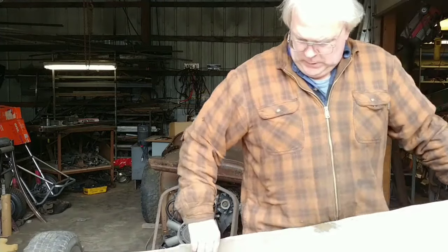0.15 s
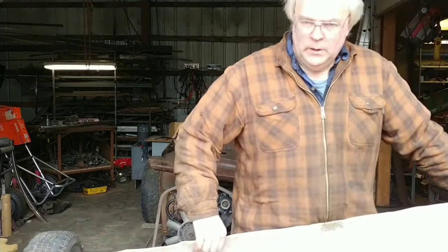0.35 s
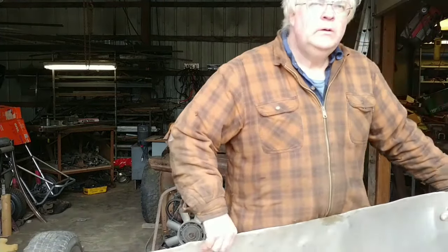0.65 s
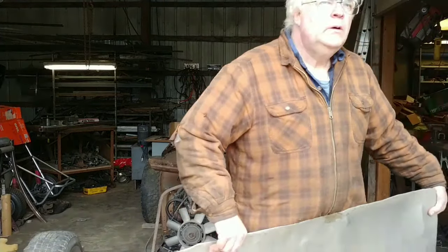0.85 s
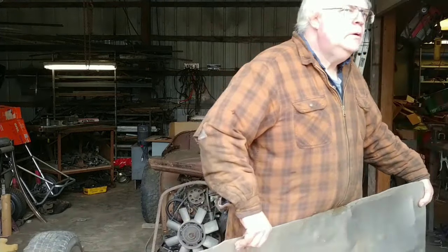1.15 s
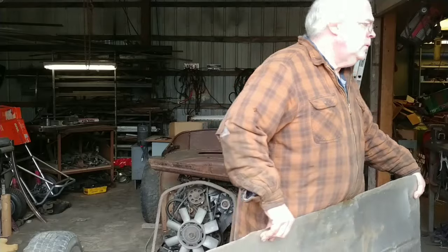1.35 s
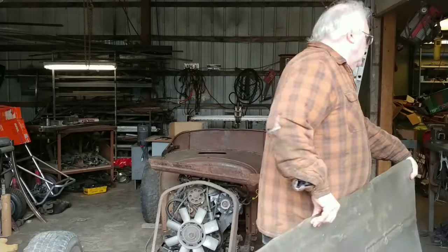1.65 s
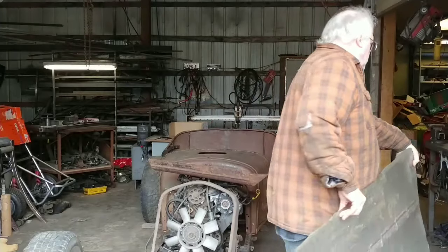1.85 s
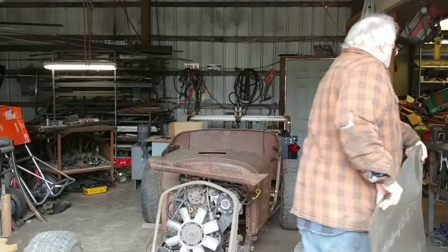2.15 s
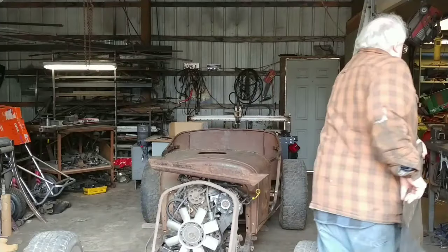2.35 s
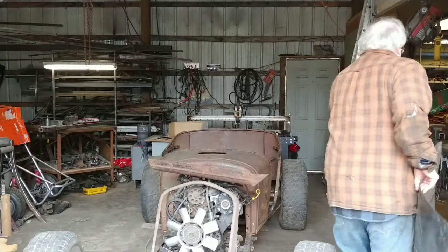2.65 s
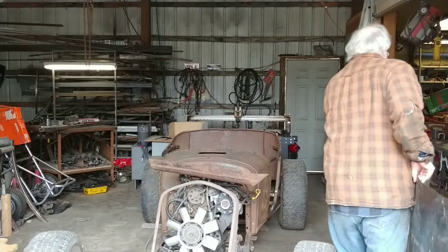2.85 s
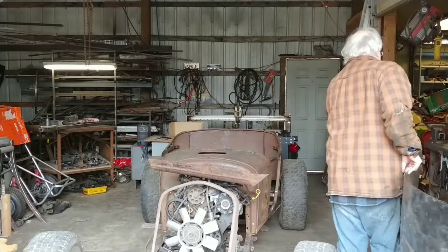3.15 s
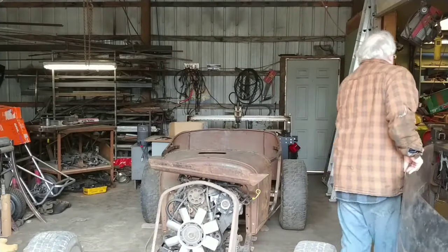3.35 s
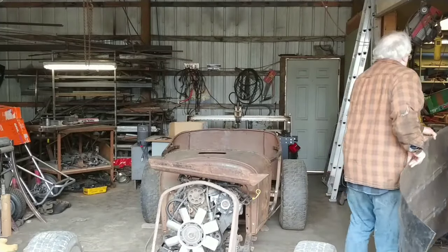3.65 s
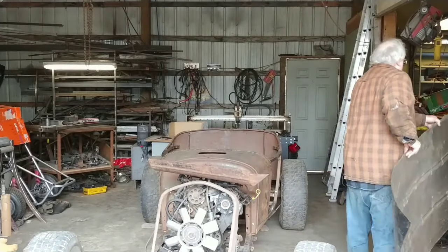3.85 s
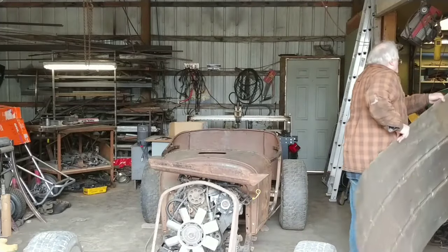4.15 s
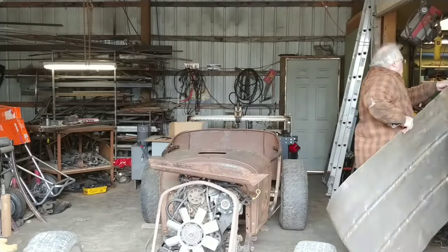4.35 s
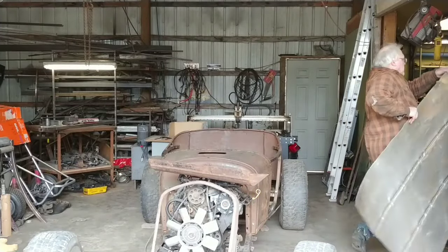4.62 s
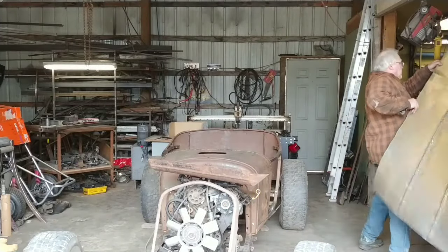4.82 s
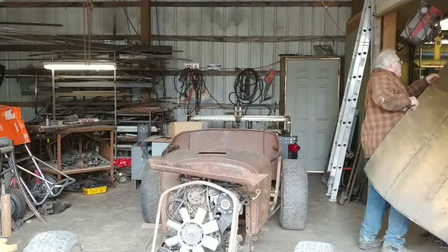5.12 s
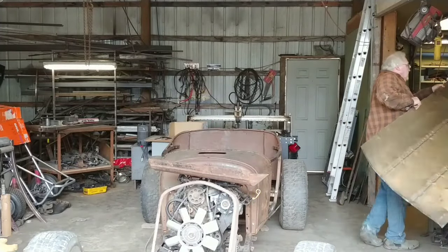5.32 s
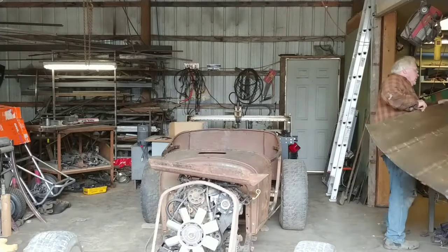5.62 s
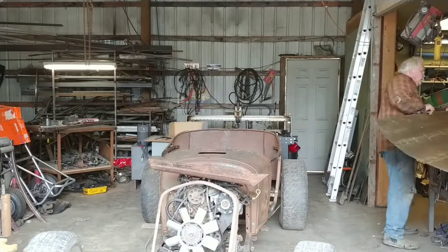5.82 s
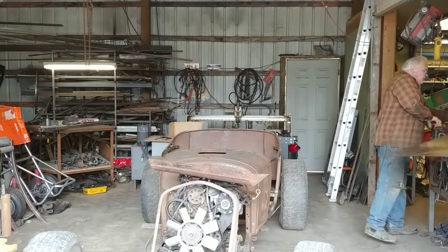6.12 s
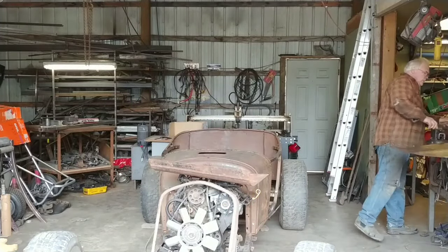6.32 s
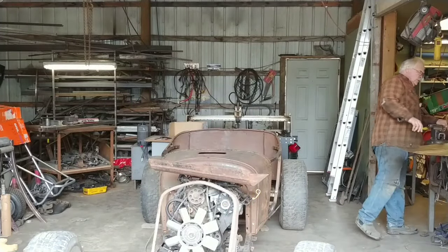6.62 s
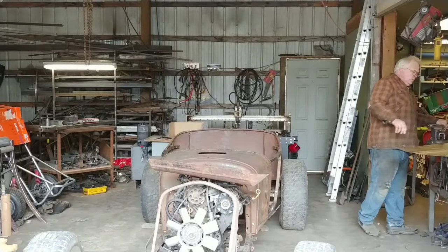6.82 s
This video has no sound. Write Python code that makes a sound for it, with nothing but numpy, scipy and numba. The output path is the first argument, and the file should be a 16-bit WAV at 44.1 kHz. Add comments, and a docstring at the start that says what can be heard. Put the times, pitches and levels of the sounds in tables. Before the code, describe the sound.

A large thin steel sheet wobbles, buckles and clatters in irregular bursts as someone carries it through a workshop and sets it down.

```python
"""A large thin steel sheet is lifted and carried across a workshop, heard through two microphone ports.
Buckles, swings and edge clatter push noise into a dense crowd of plate modes whose pitches slide as it bends.
A few lone modes sing out of the crowd as close beating pairs, each fed by its own rubbing noise.
A changing lag between the ports carries the sheet from left to right; wall sound and still air,
both shaped noise or modes drawn apart for each port, surround it."""
import sys
import numpy as np
from numba import njit
from scipy import signal
from scipy.fft import rfft, irfft, next_fast_len
from scipy.io import wavfile
from scipy.ndimage import uniform_filter1d, map_coordinates

SR = 44100
rng = np.random.default_rng(int(sys.argv[2]) if len(sys.argv) > 2 else 0)


def master(y):
    """Save y as 16-bit WAV."""
    cut = np.clip(np.atleast_2d(y).T, -1, 1)
    pcm = np.round(cut * 32767)  # scale
    wavfile.write(sys.argv[1], SR, pcm.astype(np.int16))


N = 307818


def undb(db):
    """Decibel law: amplitude gain of a level in dB."""
    return 10 ** (np.asarray(db) / 20)


def along(table, hz):
    """Logarithmic pitch scale: reads (hz, value) rows evenly per octave."""
    log_hz, values = np.log(np.array(table)[:, 0]), np.array(table)[:, 1]
    return np.interp(np.log(hz), log_hz, values)


def fft_hz(size):
    """Discrete Fourier transform: the frequency of each bin, at least 1 Hz."""
    return np.maximum(np.arange(size // 2 + 1) * SR / size, 1)


def coloured(table, lo_hz, hi_hz, skirt=5.13):
    """Spectral shaping: white noise takes the table's colour between two soft edges, rms 1."""
    size = next_fast_len(N)
    hz = fft_hz(size)
    soft_edges = np.sqrt((1 + (lo_hz / hz) ** skirt) * (1 + (hz / hi_hz) ** skirt))
    spectrum = rfft(rng.standard_normal(size)) * undb(along(table, hz)) / soft_edges
    noise = irfft(spectrum, size)[:N]
    return noise / noise.std()


# Relative spectrum of the still air of the workshop: pitch_hz [Hz], density_db [dB per Hz]
AIR_COLOUR = [(18, -30), (30, -2), (90, 11.5), (240, -17.5), (439, -10), (863, -16), (1000, -16),
              (12000, -39), (15600, -70), (22000, -120)]
AIR_DB = -59  # rms level at each port


def still_air():
    """Diffuse background noise: independent steady noise at each port."""
    return np.array([coloured(AIR_COLOUR, 20, 12000) for _ in range(2)]) * undb(AIR_DB)


# Spans in which the sound of the events is faded down faster, the steepest near 1.7 s:
# start_s [s], end_s [s], added_fade_db_per_s [dB/s]
FADES = [(0.718, .81, 30), (1.388, 1.602, 31.5), (1.621, 1.72, 152), (2.5, 2.66, 40), (3.1, 3.17, 80),
         (3.456, 3.547, 53), (4.748, 4.906, 24)]
RISE_DB = 16.5  # depth from which an event rises
FADE_POWER = 0.49  # higher modes fade faster by this power of pitch


def held(s, start, rise, hold, db, fade):
    """Exponential decay: an event's power in each range rises, fast at first, holds and fades."""
    rise_db = -RISE_DB * np.maximum(1 - (s - start) / rise, 0) ** 2
    fade_db = fade[:, None] * np.maximum(s - start - rise - hold, 0)
    added_fade_db = sum(rate * np.maximum(np.minimum(s, end) - max(begin, start), 0)
                        for begin, end, rate in FADES)
    return (s >= start) * undb(db[:, None] + rise_db - fade_db - added_fade_db) ** 2


# Buckles and wobbles in a narrow range of low modes:
# start_s [s], rise_s [s], hold_s [s], level_db [dB at the centre],
# centre_octaves [octaves above BUCKLE_HZ], fade_db_per_s [dB/s at BUCKLE_HZ]
BUCKLES = [(0.0, .1, 0.023, -44, 2.26, 21), (0.086, 0.069, .1, -32.5, 2.2, 25),
           (0.267, 0.11, .2, -26, 2.34, 23), (0.627, .008, .04, -16, 1.91, 19.5),
           (.82, .06, 0.018, -18, 1.94, 25.5), (.9, 0.029, 0.016, -13, 2.17, 49),
           (1.056, 0.01, .06, -19.5, 2.69, 27), (1.286, 0.053, .02, -34, 1.4, 20),
           (1.841, 0.0092, .1, -19.5, 2.45, 25), (2.081, .012, .05, -25, 2.3, 21),
           (2.666, 0.011, 0.043, -24.5, 1.35, 14.5), (2.804, 0.054, 0.094, -28, 1.43, 33),
           (3.174, 0.03, .01, -27, 1.16, 25), (3.516, .02, .03, -43, 2.6, 27),
           (3.634, 0.014, .13, -22.5, 2.33, 33), (3.826, 0.025, .03, -23, 2.5, 15.5),
           (4.16, .008, .08, -26, 2.6, 42), (4.18, 0.07, .26, -19.5, 3.75, 12),
           (4.4, .07, .01, -21.5, 2.4, 10), (4.927, 0.009, .08, -26.5, 2.57, 9),
           (5.117, 0.078, 0.022, -17, 2.04, 36), (5.191, 0.036, 0.065, -10.5, 2.48, 16.5),
           (5.78, 0.27, .05, -27.5, 2.58, 25), (6.178, 0.011, .02, -14, 1.78, 33),
           (6.213, 0.056, .08, -13.5, 3.04, 14.5), (6.65, 0.055, .02, -32, 2.35, 6)]
BUCKLE_HZ = 100
BELOW_BOW_DB, ABOVE_BOW_DB = 8.5, 8  # loss per squared octave below and above the centre


def buckle_power(s, hz):
    """Plate buckling: each event's power is bowed around a centre pitch."""
    octaves = np.log2(hz / BUCKLE_HZ)
    power = 0
    for start, rise, hold, db, centre, fade in BUCKLES:
        bow_db = np.where(octaves < centre, BELOW_BOW_DB, ABOVE_BOW_DB)
        level_db = db - bow_db * (octaves - centre) ** 2
        power = power + held(s, start, rise, hold, level_db, fade * 2 ** (FADE_POWER * octaves))
    return power


# Lowest modes while the sheet is swung: time_s [s], level_db [dB]
BASS = [(0.0, -51), (0.15, -42), (0.7, -25.5), (0.85, -28.5), (0.95, -23), (1.77, -70), (1.88, -29.5),
        (2.66, -50), (2.7, -33.5), (3.09, -60), (3.22, -33.5), (3.62, -64), (3.69, -32.5), (4.39, -41),
        (4.47, -30), (4.88, -40), (5.15, -25), (5.85, -43), (6.16, -47), (6.2, -34), (6.32, -29.5),
        (6.34, -32), (6.94, -40), (6.98, -33)]


def swing_power(s):
    """Forced bending: the swing's power follows its level curve."""
    return undb(np.interp(s, *np.transpose(BASS))) ** 2


# Edge contacts that shake the upper modes:
# start_s [s], rise_s [s], hold_s [s], level_db [dB at CLATTER_HZ],
# tilt_db_per_octave [dB/octave], fade_db_per_s [dB/s at CLATTER_HZ]
CLATTERS = [(0.121, 0.093, 0.14, -39, -2, 78), (0.502, 0.021, .02, -28, 0, 89),
            (0.623, .01, 0.00465, -41, 3.5, 117), (.817, .015, 0.036, -33, -2, 78),
            (0.898, 0.0071, 0.019, -27.5, -11, 113), (0.977, 0.021, .01, -24.5, 5.5, 101),
            (1.059, 0.016, 0.039, -21.5, 5, 141), (1.583, 0.0084, .02, -50.5, -1, 200),
            (1.84, 0.0057, .04, -23, 3, 122), (1.944, .018, .005, -28, 5, 79),
            (2.072, 0.011, 0.0046, -26, 4.5, 67.5), (2.395, 0.075, 0.0055, -41, -0.5, 128),
            (2.678, 0.01, .005, -55.5, -0.5, 302), (2.82, .015, 0.11, -58, -4, 107),
            (3.046, 0.055, .02, -53.5, 3.5, 500), (3.286, 0.0074, 0.072, -43.5, 6.5, 48),
            (3.515, .02, 0.052, -48.5, 4, 60), (3.634, 0.016, .005, -22, 3.5, 100),
            (3.82, .008, .005, -33.5, 5.5, 90), (3.833, 0.045, 0.0079, -27, 1, 94),
            (4.157, 0.013, 0.034, -21.5, -1, 52), (4.185, .045, .03, -17, -2.5, 51),
            (4.322, 0.063, 0.081, -14, -1.5, 60.5), (4.842, .03, 0.046, -47, 4, 63),
            (4.928, 0.0078, .01, -28, 4, 57), (5.177, 0.0061, .15, -29, 1.5, 50),
            (5.695, 0.19, 0.036, -35, 1.5, 23), (5.842, 0.24, 0.14, -30, 1.5, 55),
            (6.209, 0.052, 0.0066, -16, 2, 92), (6.23, 0.069, 0.11, -14, -2, 48),
            (6.614, 0.067, .02, -29.5, -0.5, 30)]
CLATTER_HZ = 2200
CLATTER_BOW_DB = 1.5  # loss per squared octave from CLATTER_HZ
LOW_TILT_DB = 1  # per octave: least tilt below CLATTER_HZ


def clatter_power(s, hz):
    """Contact excitation: each edge contact spreads its power over a tilted, bowed spectrum."""
    octaves = np.log2(hz / CLATTER_HZ)
    power = 0
    for start, rise, hold, db, tilt, fade in CLATTERS:
        tilt_db = np.where(octaves < 0, max(tilt, LOW_TILT_DB), tilt) * octaves
        level_db = db + tilt_db - CLATTER_BOW_DB * octaves ** 2
        power = power + held(s, start, rise, hold, level_db, fade * 2 ** (FADE_POWER * octaves))
    return power


def chatter(grain_s, scatter_db):
    """Intermittent contact: the push comes in short grains of scattered size, rms 1."""
    grain = int(grain_s * SR)
    sizes = undb(scatter_db * rng.standard_normal(N // grain + 1))
    gain = uniform_filter1d(np.repeat(sizes, grain), grain)[:N]
    return gain / np.sqrt(np.mean(gain ** 2))


# Edges of the pitch ranges that are pushed separately: pitch_hz [Hz]
EDGES_HZ = (60, 200, 650, 1400, 3500, 12000)
# Typical decay of held steel, damped by the hands: pitch_hz [Hz], t60_s [s]
RING = [(100, 0.26), (500, .3), (1500, 0.25), (4000, 0.34), (10000, 0.089)]


def effort(knock_s=0.0056):
    """Energy balance: the push replaces lost power and adds stored power, so a jump is a knock."""
    hz = np.sqrt(np.multiply(EDGES_HZ[:-1], EDGES_HZ[1:]))
    s = np.arange(0, N / SR + .001, .001)
    power = buckle_power(s, hz) + clatter_power(s, hz)
    power[0] += swing_power(s)
    power = np.array([np.interp(np.arange(N) / SR, s, p) for p in power])
    # energy decay time in samples: the energy stored per unit of power
    store = along(RING, hz) * SR / np.log(1e6)
    growth = np.gradient(uniform_filter1d(power, int(knock_s * SR)), axis=1)
    push_power = np.maximum(power + store[:, None] * growth, 0)
    return np.sqrt(push_power) * chatter(.006, 3.1)


@njit(fastmath=True)
def modes(push, hz, keep, out_gain, slide, touch, hold):
    """Modal superposition: damped rotating phasors whose pitch and coupling drift between bends."""
    out, re, im = np.zeros(len(push)), np.zeros(len(hz)), np.zeros(len(hz))
    for start in range(0, len(push), 128):
        bend, u = int(start / hold), start / hold % 1
        w = 2 * np.pi / SR * hz * (1 + (1 - u) * slide[bend] + u * slide[bend + 1])
        c, s = keep * np.cos(w), keep * np.sin(w)
        coupling = (1 - u) * touch[bend] + u * touch[bend + 1]
        for i in range(start, min(start + 128, len(push))):
            total = 0.
            for k in range(len(hz)):
                r = re[k] * c[k] - im[k] * s[k] + coupling[k] * push[i]
                im[k] = re[k] * s[k] + im[k] * c[k]
                re[k] = r
                total += out_gain[k] * r
            out[i] = total
    return out


BEND, BEND_S = 0.01502, .2  # rms relative pitch slide at each bend; seconds from one bend to the next


def ring(push, hz, t60, width_hz, patchy_db):
    """Resonance: each mode passes its share of the push at unit power."""
    keep, hold = np.exp(-np.log(1000) / (t60 * SR)), BEND_S * SR
    slide, patch = rng.standard_normal((2, int(N / hold) + 2, len(hz)))
    # the point of contact wanders over the mode shapes, so each coupling swells, fades and turns over
    touch = undb(patchy_db * np.abs(patch)) * np.sign(patch)
    # 2/3 is the mean power left by gliding between independent couplings
    touch = touch / np.sqrt(np.mean(touch ** 2) * 2 / 3)
    out_gain = np.sqrt(4 * (1 - keep ** 2) * width_hz / SR)
    # the tiny offset keeps the resonators clear of vanishingly small numbers
    return modes(push + 1e-12, hz, keep, out_gain, BEND * slide, touch, hold)


# Relative radiation of the sheet as the microphone hears it: pitch_hz [Hz], density_db [dB per Hz]
COLOUR = [(18, -53.5), (30, -27.5), (150, -1.5), (219, -9.5), (268, -5), (502, -4), (831, -10),
          (1210, -10.5), (3400, -14.5), (5620, -17), (6540, -28.5), (8620, -25.5), (12300, -44.5),
          (15900, -76), (22000, -120)]


def sheet(push_size, count=500, places=2):
    """Modal density: crowds of modes are shaken at separate places, each by its own noise."""
    out = 0
    for _ in range(places):
        push = 0
        for size, lo, hi in zip(push_size, EDGES_HZ, EDGES_HZ[1:]):
            band = signal.butter(3, (.85 * lo, hi / .85), "bandpass", fs=SR, output="sos")
            push = push + signal.sosfilt(band, size * coloured(COLOUR, lo, hi))
        # the short treble modes overlap, so fewer stand for them
        place = (np.arange(count) + rng.random(count)) / count
        hz = 30 + 12300 * place ** 1.5
        width_hz = 12300 * 1.5 * np.sqrt(place) / count  # mean spacing of the modes
        t60 = along(RING, hz) * undb(2.8 * rng.standard_normal(count))
        out = out + ring(push, hz, t60, width_hz, patchy_db=2.0)
    return out / np.sqrt(places)


# Lone modes that sing out while rubbed; a row whose end precedes its start stays silent:
# start_s [s], end_s [s], pitch_hz [Hz, middle of the pair], level_db [dB of the drive], t60_s [s]
SINGERS = [(.2, 0.76, 740, -42, 0.44), (0.65, 0.54, 240, -35.5, 0.24), (.632, .74, 450, -32, 0.51),
           (.9, 1.1, 380, -39, 0.43), (0.78, 1.1, 270, -31, 0.57), (1.0, 1.138, 3484, -35, 0.57),
           (0.73, 1.2, 2700, -43, .4), (0.98, 1.19, 1200, -33, .4), (1.2, 1.64, 410, -51, 0.32),
           (1.4, 1.62, 290, -48.5, 0.36), (1.4, 1.3, 330, -51.5, 0.47), (1.594, 1.62, 2400, -57, .2),
           (2.75, 3.4, 360, -46, 1), (2.68, 3.5, 470, -43, 0.8), (2.76, 2.92, 920, -49.5, 0.48),
           (3.3, 2.71, 1300, -52, .12), (3.194, 3.33, 430, -37, 0.53), (3.67, 3.9, 426, -32.5, 0.41),
           (4.173, 4.58, 1225, -23.5, 0.26), (4.2, 4.295, 407, -30.5, 0.089), (4.34, 4.52, 1804, -19, 0.13),
           (4.4, 4.5, 1650, -29, 0.27), (4.416, 4.48, 3090, -27, .3), (4.4, 4.46, 3100, -28, .25),
           (4.3, 4.48, 760, -35, .3), (5.2, 5.36, 490, -26, 0.42), (5.22, 5.34, 720, -32, 0.26),
           (5.26, 5.36, 375, -23.5, 0.25), (5.13, 5.2, 260, -25, 0.36), (5.13, 5.46, 160, -36, 0.39),
           (6.183, 6.23, 360, -20, 0.12)]


def singers():
    """Beating: rubbing noise feeds each lone mode as two close resonances."""
    out = np.zeros(N)
    for start, end, hz, db, t60 in SINGERS:
        keep = np.exp(-np.log(1000) / (t60 * SR))
        i = np.arange(int(start * SR), min(int((end + 1) * SR), N))  # leaves 1 s to ring on
        noise = rng.standard_normal(2 * SR)[:len(i)]
        rub = (i < end * SR) * noise * undb(db) * np.sqrt(1 - keep ** 2)
        for f in (hz * .992, hz * 1.008):
            pole = keep * np.exp(2j * np.pi * f / SR)
            out[i] += signal.lfilter([1], [1, -pole], rub).real
    return out


# Power alike at both ports; the rest comes off the walls: pitch_hz [Hz], share [fraction of power]
ALIKE = [(30, .5), (70, .8), (150, .95), (300, .93), (600, .8), (1300, .55), (2600, .45), (10000, .45)]


def workshop(straight, walls):
    """Interaural coherence: divides power between straight sound and each port's wall sound."""
    size = next_fast_len(N)
    alike = along(ALIKE, fft_hz(size))
    straight = irfft(rfft(straight, size) * np.sqrt(alike), size)[:N]
    walls = irfft(rfft(walls, size) * np.sqrt(1 - alike), size)[:, :N]
    return straight, walls


# Arrival at the left port after the right (negative is earlier): time_s [s], lag_ms [ms]
LAG = [(0, -0.18), (1.0, -0.14), (1.7, 0.12), (2.5, 0.15), (5, 0.16), (7, 0.16)]


def two_ports(straight):
    """Arrival-time difference: the straight sound reaches the nearer port first."""
    i = np.arange(N)
    lag = np.interp(i / SR, *np.transpose(LAG)) * SR / 1000  # samples
    left = map_coordinates(straight, [i - lag], order=3, mode="nearest")
    return np.array([left, straight])


def scene():
    """Superposition: the moving sheet, its wall sound and the still air add up."""
    air = still_air()
    push_size = effort()
    straight, left, right = (sheet(push_size) + singers() for _ in range(3))
    straight, walls = workshop(straight, np.array([left, right]))
    return two_ports(straight) + walls + air


TOP_HZ = 12200  # upper limit of the microphone's band


def record(dry):
    """Saturation and band limiting: rounds the loudest peaks, then cuts the top."""
    top_cut = signal.ellip(10, .2, 70, TOP_HZ, fs=SR, output="sos")
    return signal.sosfilt(top_cut, np.tanh(dry))


dry = scene()
out = record(dry)
master(out)
```